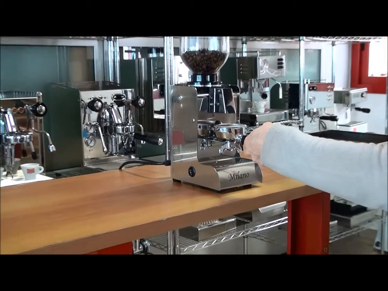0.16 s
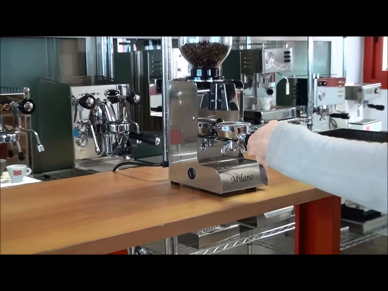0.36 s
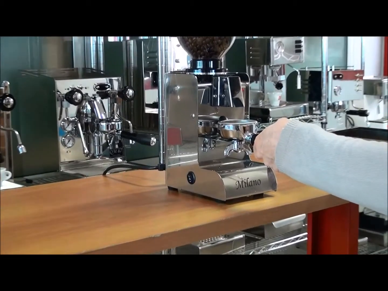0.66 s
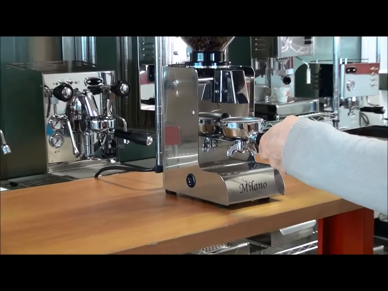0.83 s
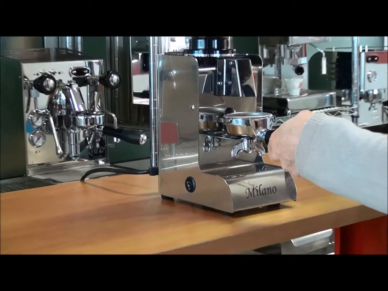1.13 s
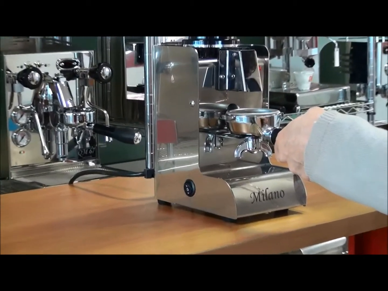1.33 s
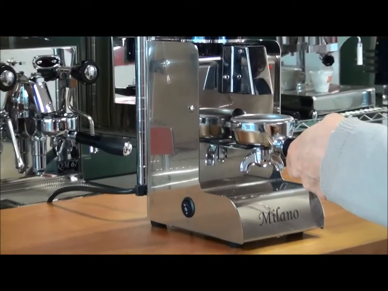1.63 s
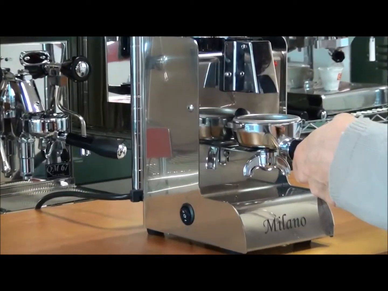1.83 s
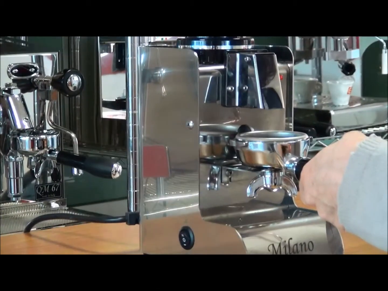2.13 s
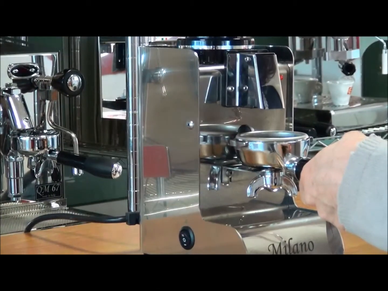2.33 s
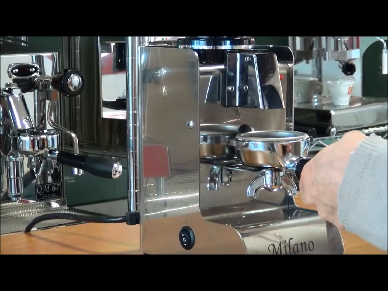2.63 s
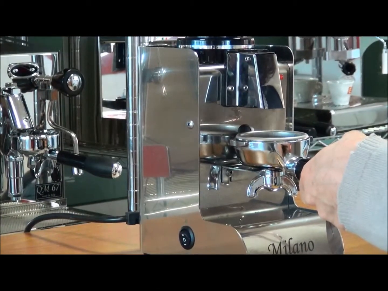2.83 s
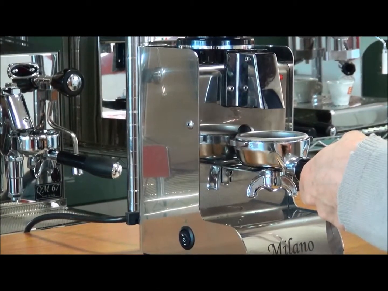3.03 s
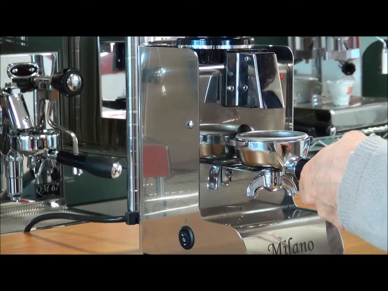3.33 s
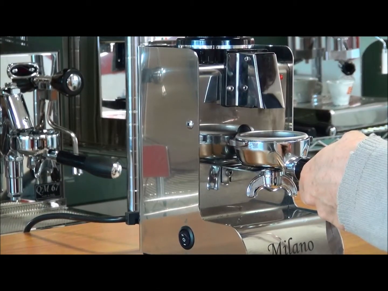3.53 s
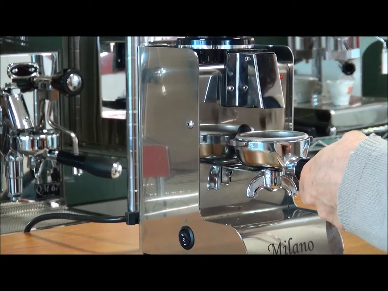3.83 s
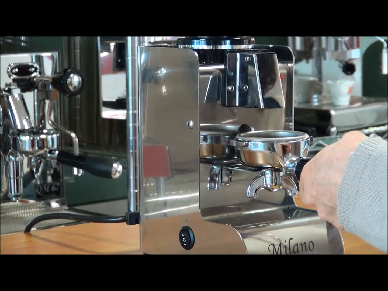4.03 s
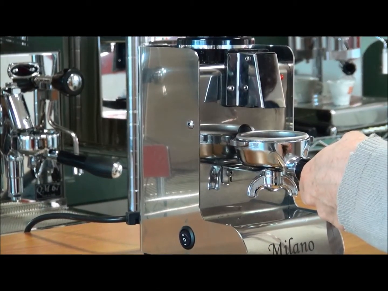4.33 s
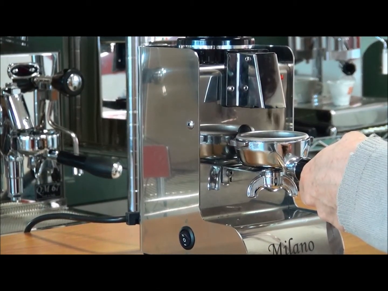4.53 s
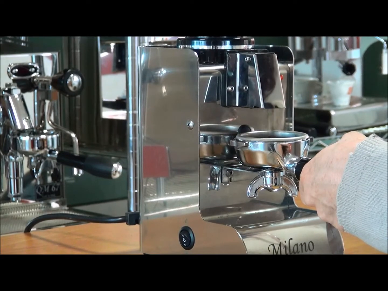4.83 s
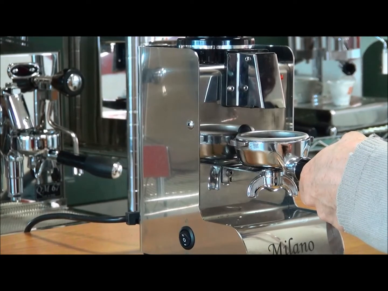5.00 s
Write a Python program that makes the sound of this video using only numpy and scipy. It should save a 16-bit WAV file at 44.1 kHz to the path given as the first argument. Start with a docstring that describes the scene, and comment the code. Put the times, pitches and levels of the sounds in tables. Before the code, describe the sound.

Close indoor coffee grinding: motor coasts to a stop, a few soft metallic clunks in near quiet, then harsh whirring crunch to the end.

```python
"""Burr grinder and filter holder

A small electric burr grinder on a wooden counter runs down, rests while the filter holder knocks against
its fork four times, then starts again. Random cracks of beans between the burrs sound directly and through
the resonances of the steel housing; sprays of splinters ring the chute. A jittering sine whines with the
motor speed. Knocks are clicks into decaying modes plus noise. Shaped noise and sines hum quietly behind."""
import sys
import numpy as np
from scipy import signal
from scipy.fft import rfft, irfft, next_fast_len
from scipy.io import wavfile
from scipy.ndimage import uniform_filter1d

SR = 44100
rng = np.random.default_rng(int(sys.argv[2]) if len(sys.argv) > 2 else 0)


def file_out(sig):
    """Save sig as 16-bit WAV at sys.argv[1]."""
    # one column per channel
    cols = np.atleast_2d(sig).T
    # limit, then scale
    lim = np.clip(cols, -1, 1)
    pcm = np.round(lim * 32767).astype(np.int16)
    wavfile.write(sys.argv[1], SR, pcm)


N = 227688


def from_db(db):
    """Decibels to gain."""
    return 10 ** (np.asarray(db) / 20)


def rms_one(x):
    """Scale to unit power."""
    return x / np.sqrt(np.mean(x ** 2) + 1e-20)


def clock():
    """Seconds at every sample."""
    return np.arange(N) / SR


def in_time(rows):
    """Interpolate the columns of a table over time; first column in seconds."""
    time_s, *columns = np.transpose(rows)
    return [np.interp(clock(), time_s, column) for column in columns]


def shaped(x, curve):
    """Colour by a (freq_hz, level_db) curve, interpolated on log frequency."""
    size = next_fast_len(N)
    bin_hz = np.maximum(np.arange(size // 2 + 1) * SR / size, 1)
    curve_hz, curve_db = np.transpose(curve)
    gain = from_db(np.interp(np.log(bin_hz), np.log(curve_hz), curve_db))
    return irfft(rfft(x, size) * gain, size)[..., :N]


def band(x, low_hz, high_hz):
    """Butterworth band-pass."""
    sos = signal.butter(3, [low_hz, high_hz], "band", fs=SR, output="sos")
    return signal.sosfilt(sos, x)


def drift(rate_hz):
    """Slow chance with spread 1: low-passed noise made at 1/40 of the sample rate."""
    r = np.exp(-80 * np.pi * rate_hz / SR)
    noise = rng.standard_normal(N // 40 + 2002)
    slow = signal.lfilter([1], [1, -2 * r, r * r], noise)[2000:]   # skip the filter's settling
    return np.interp(np.arange(N) / 40, np.arange(len(slow)), rms_one(slow))


def resonate(x, hz, width_hz):
    """Two-pole resonance with gain 1 on top."""
    r = np.exp(-np.pi * width_hz / SR)
    poles = [1, -2 * r * np.cos(2 * np.pi * hz / SR), r * r]
    return signal.lfilter([(1 - r * r) / 2, 0, (r * r - 1) / 2], poles, x)


def tone(hz, jitter_share, gain, rough_db, rate_hz):
    """A sine whose pitch and strength jitter."""
    phase = 2 * np.pi * np.cumsum(hz * (1 + jitter_share * drift(rate_hz))) / SR
    return gain * from_db(rough_db * drift(rate_hz)) * np.sqrt(2) * np.sin(phase)


def bursts(times_s, levels_db, t60_s):
    """Envelope that jumps at each time and dies away exponentially."""
    clicks = np.zeros(N) + 1e-18
    clicks[np.round(np.asarray(times_s) * SR).astype(int)] = from_db(levels_db)
    return signal.lfilter([1], [1, -from_db(-60 / (t60_s * SR))], clicks)


def swell(start_s, length_s, edge_s):
    """Gain that fades in before start_s, holds for length_s and fades out after."""
    t = clock() - start_s
    return np.clip(np.minimum(t, length_s - t) / edge_s + 1, 0, 1) ** 2


# mains hum: freq_hz, level_db (mean)
MAINS_HUM = [(48.4, -71), (96.9, -71.5), (199.2, -70.5), (400, -84), (484.5, -75)]
# ventilation and hiss spectrum: freq_hz, density_db (relative, per Hz)
SHOP_SPECTRUM = [(20, -26), (35, -11), (60, -3), (110, -6.5), (300, -3.5), (500, -9), (800, -11),
                 (1500, -17), (3300, -25), (8000, -29), (13000, -26), (15800, -22.5)]
SHOP_DB = -56.5


def shop():
    """Ventilation and microphone hiss as shaped noise, with a wavering mains hum of sines."""
    hum = 0
    for hz, db in MAINS_HUM:
        gain = from_db(db + 3.2 * drift(0.84))
        hum = hum + gain * np.sqrt(2) * np.sin(2 * np.pi * (hz * clock() + rng.random()))
    air = rms_one(shaped(rng.standard_normal(N), SHOP_SPECTRUM))
    return hum + from_db(SHOP_DB) * air


# swells of the hum's strongest overtone: start_s, length_s, level_db (added to the rest level)
DRONE_SWELLS = [(.97, 0.14, -62), (1.25, 0.42, -63.5), (1.76, 0.39, -66)]
DRONE_HZ, DRONE_REST_DB = 293, -71.5


def drone():
    """One hum overtone, a jittering sine, swells now and then."""
    gain = from_db(DRONE_REST_DB)
    for start_s, length_s, level_db in DRONE_SWELLS:
        gain = gain + from_db(level_db) * swell(start_s, length_s, edge_s=0.049)
    return tone(DRONE_HZ, 0.0028, gain, rough_db=2.5, rate_hz=20)


SQUEAL_S, SQUEAL_LENGTH_S, SQUEAL_DB = 0.42, 0.11, -67
SQUEAL_HZ, SQUEAL_SAG_HZ_PER_S = 3460, 200
LINGER_S, LINGER_HZ, LINGER_DB, LINGER_T60_S = 0.38, 402, -46, 0.73


def coming_to_rest():
    """A thin sagging squeal and the housing's low hum dying away after the stop."""
    squeal_hz = SQUEAL_HZ - SQUEAL_SAG_HZ_PER_S * (clock() - SQUEAL_S)
    squeal_gain = from_db(SQUEAL_DB) * swell(SQUEAL_S, SQUEAL_LENGTH_S, edge_s=0.056)
    squeal = tone(squeal_hz, 0.0051, squeal_gain, rough_db=2.5, rate_hz=40)
    fading = uniform_filter1d(bursts([LINGER_S], LINGER_DB, t60_s=LINGER_T60_S), size=800)
    return squeal + tone(LINGER_HZ, 0.0186, fading, rough_db=3.0, rate_hz=25)


# holder on fork: start_s, strength_db (relative), brightness_db (relative)
KNOCKS = [(0.71, -20, -27), (1.436, -21, -13.5), (1.681, -24, -36), (1.965, -24, -26)]
# holder, fork and counter ringing: freq_hz, level_db (relative), t60_s
FORK_MODES = [(179, -2, 0.14), (342, -16, 0.071), (594, -3.5, 0.08), (665, -13, 0.11), (737, -4, 0.074),
              (790, -15, 0.099), (962, 0.5, 0.051), (1004, 0, 0.046), (1148, 4.5, 0.05),
              (1320, 14.5, 0.015), (1540, -6.5, 0.063), (1790, -7, 0.044), (2140, 15, 0.0054),
              (2350, -22, 0.02), (2580, -18, .025), (3090, -1.5, 0.025), (3400, -27, 0.02),
              (4220, 0.5, 0.008), (4870, -8, 0.015), (5900, -41, .02)]


def knocks():
    """Each blow builds over three close contacts, rings the modes, bounces off the counter, leaves a dull tail."""
    ringing = np.zeros(N)
    start_s, strength_db, bright_db = np.transpose(KNOCKS)
    chance = rng.standard_normal((len(start_s), len(FORK_MODES)))
    for k, (hz, db, t60_s) in enumerate(FORK_MODES):
        tilt_db = 0.2 * (bright_db + 28.5) * hz / 1000
        strength = from_db(strength_db + db - 11 + 0.82 * chance[:, k] + tilt_db)
        # rebound: duller, only in modes above 250 Hz, so the low thump stays full
        bounce = from_db(-8 - 1.5 * hz / 1000) * (hz > 250)
        clicks = np.zeros(N) + 1e-18
        for lag_s, gain in [(0.0009, 0.085), (0.0014, -0.11), (0.002, 0.67), (0.0051, bounce)]:
            clicks[np.round((start_s + lag_s) * SR).astype(int)] += gain * strength
        r, w = from_db(-60 / (t60_s * SR)), 2 * np.pi * hz / SR
        ringing += signal.lfilter([0, np.sin(w)], [1, -2 * r * np.cos(w), r * r], clicks)
    # soft contact; the small body radiates no deep bass
    ringing = band(band(ringing, 151.3, 5400), 66, 4700)
    noise = rng.standard_normal((3, N))
    crack_gain = bursts(start_s + 0.00085, strength_db + bright_db - 2.5, t60_s=0.021)
    crack = rms_one(band(noise[0], 6300, 14500)) * crack_gain
    thud = rms_one(band(noise[1], 420, 3000)) * bursts(start_s + 0.003, strength_db - 12.5, t60_s=0.016)
    tail = rms_one(band(noise[2], 280, 2300)) * bursts(start_s + 0.00084, strength_db - 23.0, t60_s=0.15)
    return ringing + crack + thud + tail


HALT_S, COAST_POWER = 0.36, 0.8   # speed falls as (time left) to this power
START_S, KICK_SHARE, SPIN_UP_S = 2.075, 0.44, 0.09   # jump to a share of full speed, then close in


def speed():
    """Share of full rotor speed: coasting to a halt, then spinning up."""
    t = clock()
    coasting = np.clip(1 - t / HALT_S, 0, 1) ** COAST_POWER
    lag = (1 - KICK_SHARE) * np.exp(-np.maximum(t - START_S, 0) / SPIN_UP_S)
    share = np.where(t < START_S, coasting, 1 - lag)
    return np.abs(uniform_filter1d(share, size=160))


def building(build_s):
    """Gain of 1 up to the halt, then 0, growing smoothly to 1 after switch-on."""
    since_s = clock() - START_S
    return np.where(clock() < HALT_S, 1, np.clip(since_s / build_s, 0, 1) ** 3)


GEAR_HZ, GEAR_DB, GEAR_SPEED_POWER = 3510, -40, 1.4   # at full speed
GEAR_STRAIN_DB, GEAR_BUILD_S = 33, 0.028   # strain: times the missing share of speed
GEAR_JITTER_SHARE, GEAR_SLOW_JITTER_SHARE, GEAR_WANDER_SHARE = 0.011, 0.14, 0.006   # of pitch


def gear():
    """The tooth rate follows the rotor; rougher when slow, louder while the motor pulls up to speed."""
    share = speed()
    strain_db = GEAR_STRAIN_DB * (1 - share) * (clock() > START_S)
    gain = from_db(GEAR_DB + strain_db) * share ** GEAR_SPEED_POWER * building(GEAR_BUILD_S)
    hz = GEAR_HZ * share * (1 + GEAR_WANDER_SHARE * drift(1.7))
    jitter_share = GEAR_JITTER_SHARE + GEAR_SLOW_JITTER_SHARE * (1 - share)
    return tone(hz, jitter_share, gain, rough_db=4, rate_hz=90)


def cracks(per_s, spread_db, clump_db):
    """Dense fractures of uneven size that come in clumps as beans drop into the burrs."""
    size_db = spread_db * np.minimum(rng.exponential(1, N), 5)
    sizes = from_db(size_db) * rng.standard_normal(N)
    hits = rng.random(N) < per_s / SR
    return rms_one(sizes * hits * from_db(clump_db * drift(22.0)))


# brittle beans shattering: start_s, strength_db (relative), top_db (highest treble, relative to strength)
SHATTERS = [(2.6306, -5.5, -1), (2.688, -10, -3), (2.8814, -12, 0), (2.9911, -8, -3), (3.0621, -14, 11),
            (3.179, -15, 16), (3.25, -19, 17), (3.4141, -10, -1), (3.479, -19, 15), (3.77, -13, 9),
            (3.8136, -17, -10), (4.0323, -11.5, 0), (4.0982, -13.5, 10), (4.283, -11.5, 10),
            (4.329, -12, 1), (4.3686, -15, 7), (4.566, -15, 5), (4.6513, -12.5, 6), (4.9394, -22, 8.5),
            (4.993, -17.5, 14)]


def shatter():
    """A short spray of splinters rings the chute's treble resonances."""
    start_s, strength_db, top_db = np.transpose(SHATTERS)
    spray = cracks(per_s=7400, spread_db=3.5, clump_db=3.0)
    low = rms_one(resonate(spray, 7880, 730) + 0.5 * resonate(spray, 6470, 400))
    high = rms_one(resonate(spray, 10960, 800) - resonate(spray, 13300, 900))
    low_gain = bursts(start_s, strength_db - 16, t60_s=0.098)
    high_gain = bursts(start_s, strength_db + top_db - 22.5, t60_s=0.067)
    return low * low_gain + high * high_gain


# beans cracking, direct spectrum: freq_hz, density_db (relative, per Hz)
CRUNCH_SPECTRUM = [(120, -51), (200, -27), (340, -17.5), (481, -0.5), (681, -6), (964, -8), (1390, -12.5),
                   (2190, -14), (3220, -14), (3460, -16), (4010, -19), (5280, -19.5), (7740, -10),
                   (11600, -10), (15800, -16.5)]
# housing resonances: freq_hz, width_hz, level_db (relative)
HOUSING_MODES = [(217.4, 24, -23.5), (392, 16.4, -10), (477.2, 17, 4), (517.5, 17.7, -5), (587.3, 5.4, 2.5),
                 (749, 45, -14), (793, 9.5, -4), (891.5, 24, -3.5), (966, 34.6, 0), (989, 16, -8),
                 (1163, 56, -11), (1194, 13.3, -11.5), (1733, 7.5, -10.5), (1849, 17.4, -9),
                 (2117, 41, -9.5), (2232, 42, -12), (2488, 10, -9.5), (2950, 34, -15.5), (3420, 4.6, -10),
                 (4730, 91, -20.5), (5700, 38, -14), (6104, 40, -15), (6820, 50, -13), (7380, 72, -26),
                 (7810, 160, -10.5), (8850, 140, -13.5), (9940, 99, -31), (11830, 340, -15.5),
                 (12700, 550, -21.5)]


def crunch():
    """Cracks sound directly and through the housing, whose modes are shaken unevenly."""
    direct = rms_one(shaped(cracks(per_s=16000, spread_db=1.6, clump_db=0.6), CRUNCH_SPECTRUM))
    shaking = [cracks(per_s=12000, spread_db=1.6, clump_db=0.6) for _ in range(3)]
    body = 0
    for k, (hz, width_hz, db) in enumerate(HOUSING_MODES):
        # small treble parts rattle more fitfully
        uneven_db = (0.58 + 0.4 * hz / 1000) * drift(16.7)
        mode = resonate(shaking[k % 3], hz, width_hz) * (-1) ** k
        body = body + from_db(db + uneven_db) * mode
    return direct + from_db(18) * body


# beans feeding the burrs: time_s, load_db (before layer share), crackle_db (crackle layer only)
FEED = [(0, 1.5, 1.5), (2.1, 3, 3.5), (2.2, 1, 2.5), (2.3, -2.5, -2.5), (2.54, -1.5, -1),
        (2.66, -0.5, -0.5), (3.0, 0, 1), (3.05, 0, -3), (3.12, -0.2, 2), (3.45, 0.5, -1), (3.68, -0.5, -3),
        (3.8, 1, -0.2), (4.25, 0, -0.9), (4.46, 0.1, -0.5), (4.6, -0.5, -0.2), (4.84, -2, -1),
        (4.98, -0.4, -2.3), (5.16, -0.8, 0)]
# housing booms up when the burrs bite hard: centre_s, rise_db (before layer share)
SURGES = [(.03, 4.5), (.12, 4), (.25, 4), (2.19, 5), (2.5, 1.5), (2.77, 2.5), (3.0, 2), (3.22, 1),
          (3.39, 4), (4.21, 3), (4.36, 5), (4.47, 8), (4.67, 3), (4.97, 1.5)]
SURGE_S = 0.027   # standard deviation
# boom, rasp, crackle: level_db (at full speed), speed_power, load_share, surge_share, afterring_db (relative)
LAYERS = [(-29, 0.35, 0.71, 0.88, -13), (-28, 1.12, 1.0, 0.16, -14), (-30.5, 2.02, 0.1, .1, -35)]
# boom, rasp, crackle band limits: edge_hz
LAYER_EDGES_HZ = [150, 1400, 5000, 18000]
# boom, rasp, crackle growth after switch-on: build_s
LAYER_BUILD_S = [.011, .005, .002]
AFTERRING_T60_S = 0.61
SWITCH_DB, SWITCH_T60_S = -26.5, 0.03


def grinder():
    """Boom, rasp and crackle bands of the crunch follow speed, load and surges; a bright snap at switch-on."""
    sound = crunch()
    load_db, crackle_db = in_time(FEED)
    surge_db = sum(db * np.exp(-0.5 * ((clock() - s) / SURGE_S) ** 2) for s, db in SURGES)
    keep = from_db(-120 / (AFTERRING_T60_S * SR))   # per-sample decay of power
    out = 0
    for k, (db, speed_power, load_share, surge_share, after_db) in enumerate(LAYERS):
        level_db = db + load_share * load_db + surge_share * surge_db + (k == 2) * crackle_db
        gain = from_db(level_db) * speed() ** speed_power * building(LAYER_BUILD_S[k])
        lagging_power = signal.lfilter([1 - keep], [1, -keep], gain ** 2, zi=[gain[0] ** 2])[0]
        after_power = lagging_power * from_db(2 * after_db)
        layer = rms_one(band(sound, LAYER_EDGES_HZ[k], LAYER_EDGES_HZ[k + 1]))
        out = out + np.sqrt(gain ** 2 + after_power) * layer
    snap = rms_one(band(sound, 2500, 18000)) * bursts([START_S], SWITCH_DB, t60_s=SWITCH_T60_S)
    return out + snap


# excess on the right: freq_hz, level_db (under the middle)
LEAN_CURVE = [(30, -25), (100, -37), (250, -50), (420, -51), (16000, -67)]
# smeared copy, opposite in left and right: freq_hz, level_db (under the middle)
WIDTH_CURVE = [(30, -21), (60, -21), (125, -21), (250, -34), (500, -17), (1000, -84), (2000, -46),
               (4000, -66), (8000, -23), (10500, -31), (12000, -73)]


def scene():
    """Sources near the middle; a faint noise-smeared copy is added left, subtracted right; slight lean right."""
    mid = shop() + drone() + coming_to_rest() + knocks() + gear() + shatter() + grinder()
    smear = rng.standard_normal(2000) * np.exp(-np.arange(2000) / 400)
    smeared = signal.fftconvolve(mid, smear / np.linalg.norm(smear))[:N]
    side = shaped(smeared, WIDTH_CURVE) - shaped(mid, LEAN_CURVE)
    return np.array([mid + side, mid - side])


# microphone response: freq_hz, level_db
MICROPHONE_CURVE = [(20, 0.5), (11800, 0.5), (12400, -9.5), (12900, 1), (16000, -1.5)]
CUTOFF_HZ = 15720


def record(dry):
    """The microphone dips in the high treble; a steep elliptic low-pass cuts the top."""
    low_pass = signal.ellip(12, 0.3, 70, CUTOFF_HZ, fs=SR, output="sos")
    return signal.sosfilt(low_pass, shaped(dry, MICROPHONE_CURVE))


dry = scene()
out = record(dry)
file_out(out)
```